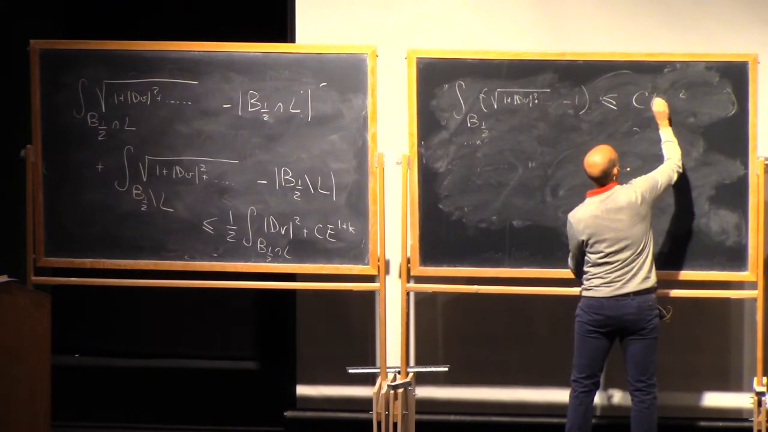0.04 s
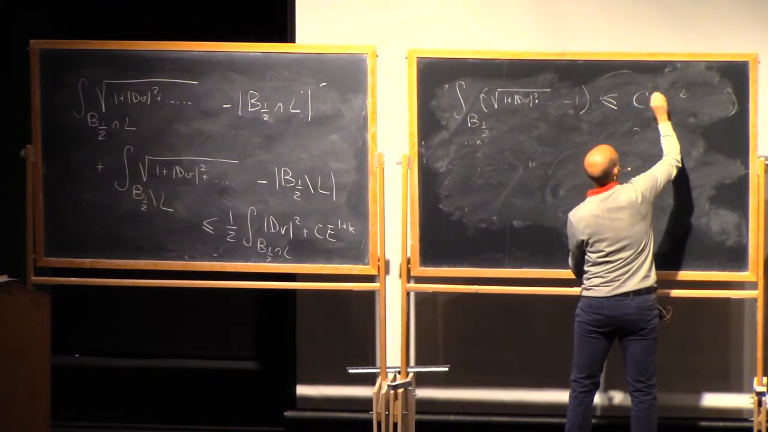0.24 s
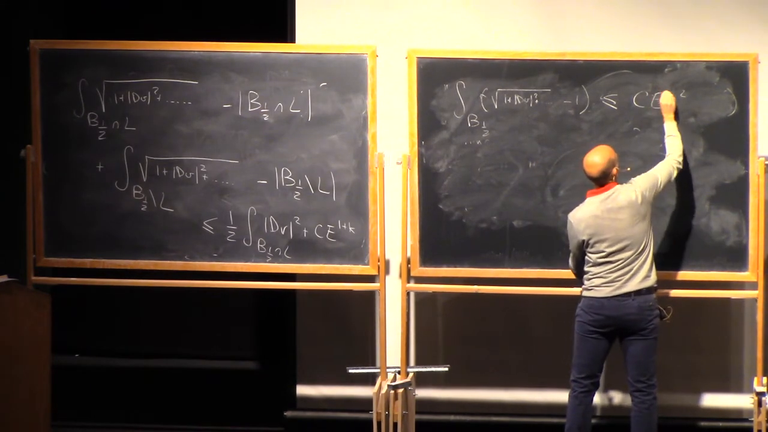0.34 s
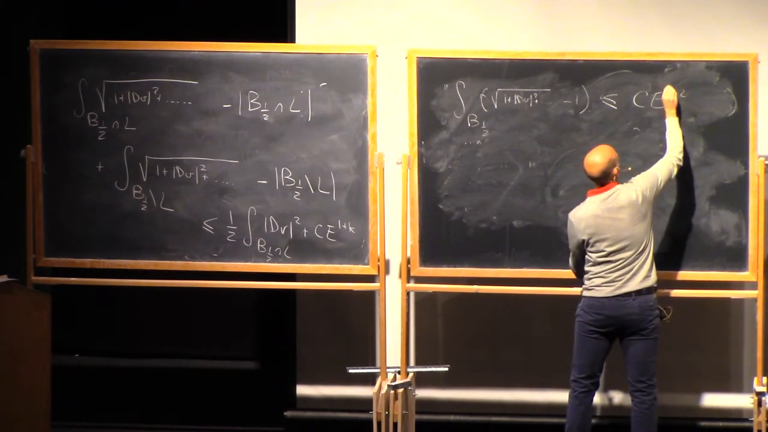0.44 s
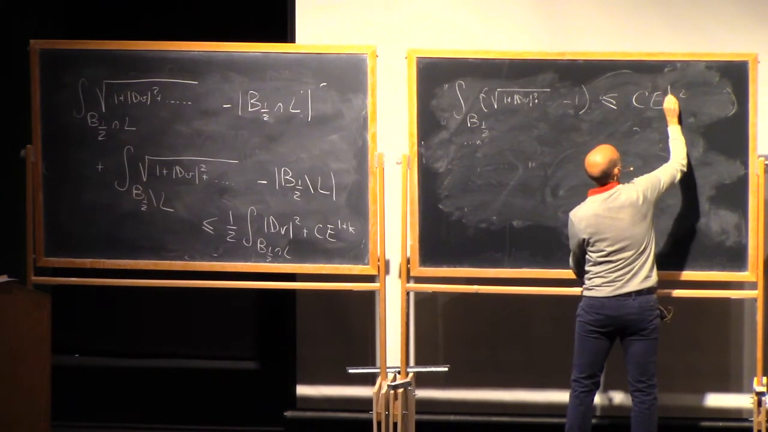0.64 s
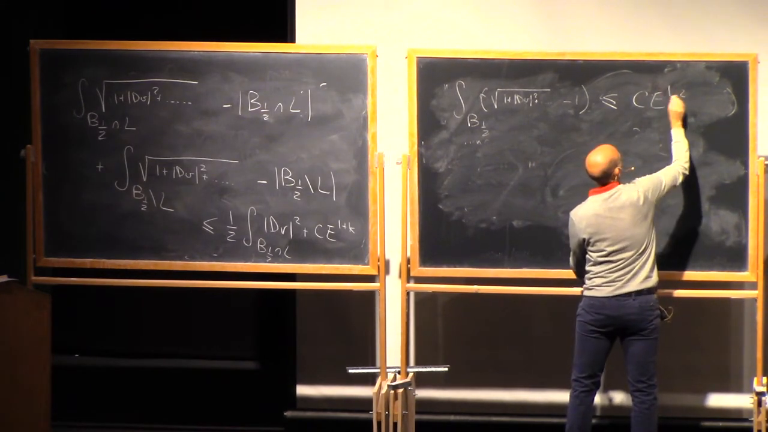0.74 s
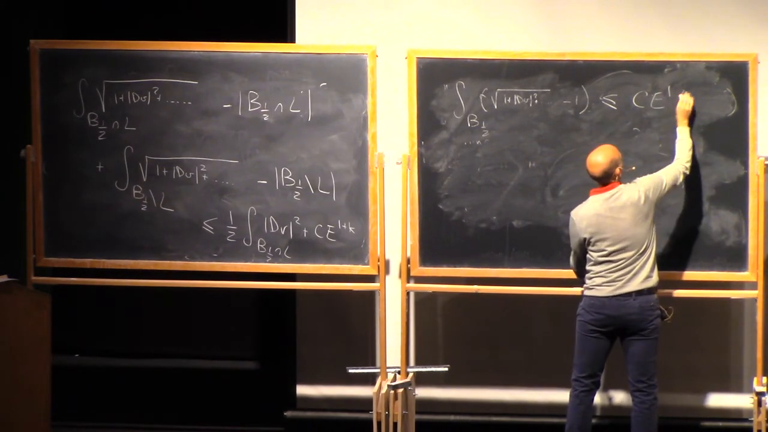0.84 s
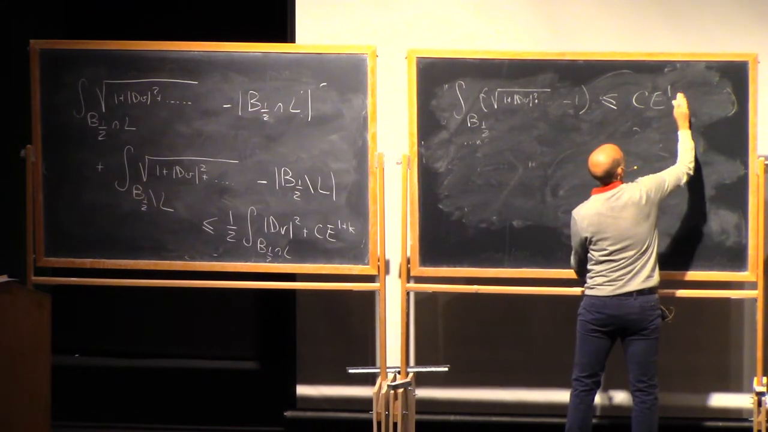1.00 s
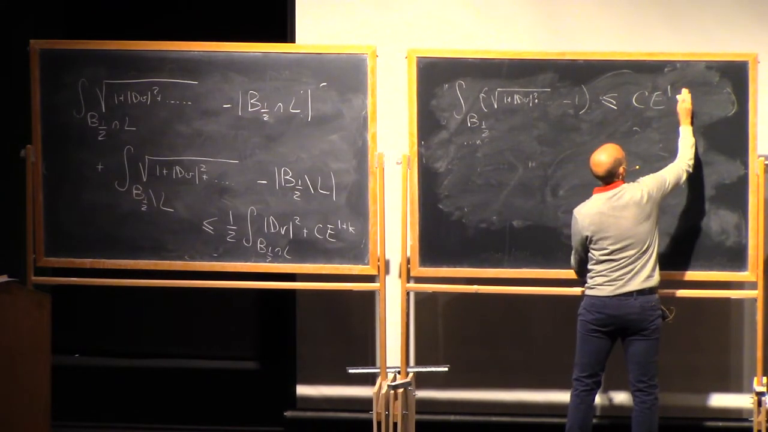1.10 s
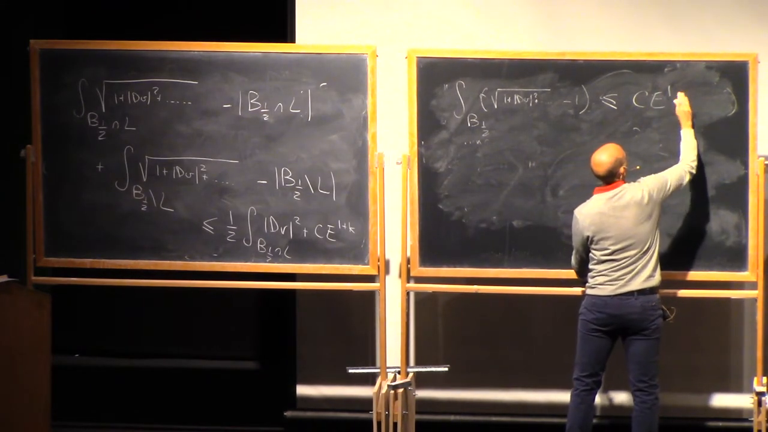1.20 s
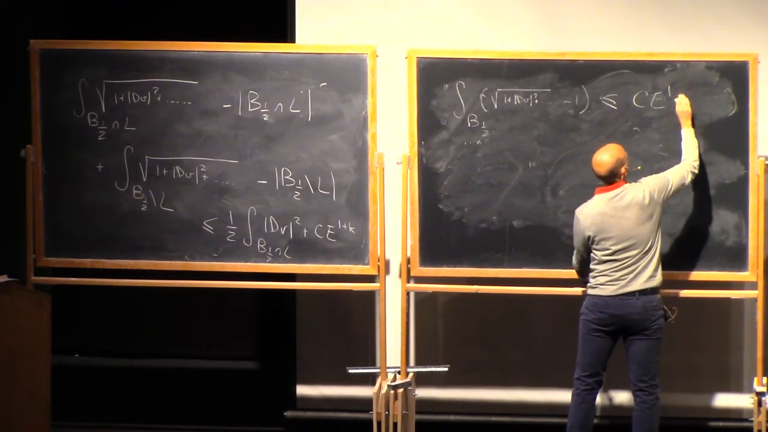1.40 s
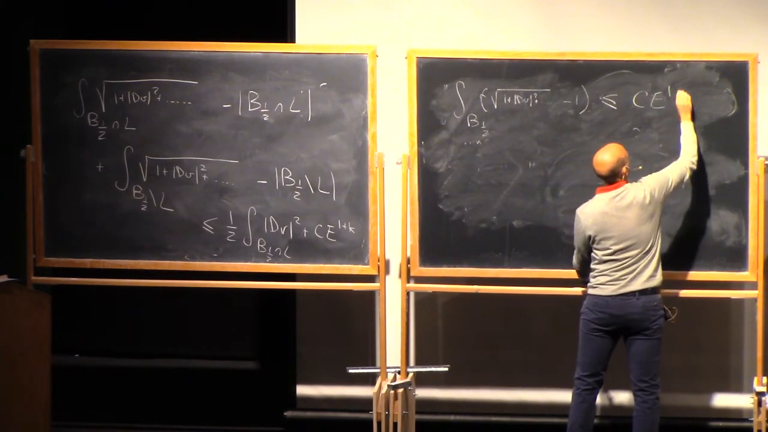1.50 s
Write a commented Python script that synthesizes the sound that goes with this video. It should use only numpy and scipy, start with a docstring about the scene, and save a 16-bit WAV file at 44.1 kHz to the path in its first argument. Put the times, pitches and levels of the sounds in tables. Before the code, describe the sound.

Chalk taps and scrapes on a blackboard in a quiet room.

```python
"""Chalk on a blackboard

Chalk writes on a big framed blackboard over the low rumble of a quiet lecture room.
The stick lands twice with a sharp tap and knocks lightly between strokes; the panel thumps and
rings and the room answers. The first strokes scrape faintly as the chalk crumbles in tiny slips;
the later, lighter ones only hiss."""
import sys
import numpy as np
from scipy import signal
from scipy.fft import rfft, irfft
from scipy.io import wavfile

SR = 44100
rng = np.random.default_rng(int(sys.argv[2]) if len(sys.argv) > 2 else 0)


def persist_wave(psi):
    """Save psi, clipped to +-1, as 16-bit WAV."""
    counts = np.round(np.clip(psi, -1, 1) * 32767).astype(np.int16)
    wavfile.write(sys.argv[1], SR, np.atleast_2d(counts).T)


N = 68355
TIME = np.arange(N) / SR


def from_db(db):
    return 10 ** (np.asarray(db) / 20)


def rms_one(x):
    return x / np.sqrt(np.mean(x ** 2) + 1e-20)


def ring(drive, hz, t60):
    """A unit click sets a sine of height 1 ringing."""
    r, w = from_db(-60 / (t60 * SR)), 2 * np.pi * hz / SR
    return signal.lfilter([0, np.sin(w)], [1, -2 * r * np.cos(w), r * r], drive + 1e-18)


def resonance(drive, hz, width):
    """Band-pass with gain 1 at its centre."""
    r, w = np.exp(-np.pi * width / SR), 2 * np.pi * hz / SR
    gain = (1 - r * r) / 2
    return signal.lfilter([gain, 0, -gain], [1, -2 * r * np.cos(w), r * r], drive + 1e-18)


def noise(spectrum):
    """Steady noise of the given colour, rms 1."""
    hz, db = np.transpose(spectrum)
    bins = np.maximum(np.fft.rfftfreq(N, 1 / SR), 1)
    colour = from_db(np.interp(np.log(bins), np.log(hz), db))
    return rms_one(irfft(rfft(rng.standard_normal(N)) * colour, N))


def diffuse(x, spectrum, rise_s, t60):
    """Dense echoes that build up and die away; gain 1 around 1 kHz."""
    echoes = noise(spectrum) * (1 - np.exp(-TIME / rise_s)) * from_db(-60 * TIME / t60)
    mids = abs(rfft(echoes))[300 * N // SR:2000 * N // SR]
    return signal.fftconvolve(x, echoes / np.sqrt(np.mean(mids ** 2)))[:N]


def strokes(rows, roundness=0.27):
    """Each stroke swells and fades as the hand speeds up and stops."""
    power = np.zeros(N)
    for start, length, db in rows:
        arch = abs(np.sin(np.pi * np.clip((TIME - start) / length, 0, 1)))
        power += (from_db(db) * arch ** roundness) ** 2
    return np.sqrt(power)


def room_rumble():
    """A low, steady bed of room tone."""
    # room tone colour: f/Hz, level/dB
    colour = [(25, -21), (45, -3), (65, -2.5), (90, 4.5), (115, 3), (160, 2), (250, -6), (340, -10),
              (500, -9), (900, -16.5), (1400, -23.5), (2500, -30.5), (5000, -32), (16000, -34)]
    return from_db(-52) * noise(colour)


def scrape(slips_per_s=5000, scatter_db=2.5):
    """Chalk crumbles in dense tiny slips that excite a few resonances."""
    # scraping strokes: t/s, length/s, level/dB
    gestures = [(-.05, 0.11, -61.5), (.08, 0.15, -63.5), (.34, 0.2, -59.5), (.52, 0.12, -68.5),
                (.66, 0.11, -63.5), (.76, 0.16, -63)]
    # scrape resonances: f/Hz, width/Hz, level/dB
    peaks = [(1661, 168, 6), (2320, 370, -6.5), (2893, 300, -3.5), (4830, 250, -13)]
    slips = (rng.random(N) < slips_per_s / SR) * rng.standard_normal(N)
    slips *= from_db(scatter_db * rng.standard_normal(N))
    rasp = sum((-1) ** k * from_db(db) * resonance(slips, hz, width)
               for k, (hz, width, db) in enumerate(peaks))
    return rms_one(rasp) * strokes(gestures)


def drag():
    """A firmly dragged stick sets the panel rumbling."""
    # firm strokes: t/s, length/s, level/dB
    gestures = [(-.03, .1, -56.5), (.16, 0.067, -54.5), (.4, 0.078, -59), (.665, .23, -56)]
    # panel rumble colour: f/Hz, level/dB
    colour = [(100, -16), (220, 1.5), (400, 1), (600, -2), (900, -6), (1300, -17), (3000, -36.5)]
    return noise(colour) * strokes(gestures)


def glide():
    """With little pressure a stroke gives only a fine, high hiss."""
    # envelopes of two single light strokes: t/s, level/dB
    singles = [
        [(0.0, -72), (0.078, -69.5), (0.09, -99), (0.13, -82)],
        [(0.51, -73), (0.542, -69.5), (0.622, -73), (0.65, -82)],
    ]
    # envelope of a run of five: t/s, level/dB
    run = [(0.85, -85), (0.886, -72), (0.954, -60.5), (0.992, -64), (1.008, -79), (1.042, -59),
           (1.106, -64), (1.118, -60), (1.248, -62.5), (1.264, -66), (1.324, -62.5), (1.396, -74),
           (1.404, -81), (1.43, -72)]
    # hiss colour: f/Hz, level/dB
    colour = [(2500, -19.5), (4500, -8.5), (7000, -4.5), (8500, -3.5), (9800, 1.5), (11000, -1),
              (12200, 2.5), (13500, -8), (15000, -4), (16000, -4)]
    curves = map(np.transpose, (*singles, run))
    envelope = sum(np.interp(TIME, t, from_db(db), left=0, right=0) for t, db in curves)
    return noise(colour) * from_db(2.5) * envelope


def knock(force, snap):
    """The attack of a contact: the push knocks on the panel and the stick rings briefly."""
    # chalk stick modes: f/Hz, level/dB, t60/s
    modes = [(3450, -27.5, 0.0091), (5000, -24.5, 0.0036), (6100, -47, 0.0076), (7400, -25.5, 0.0037),
             (9400, -35, 0.0054), (10700, -38, .004)]
    panel_low_hz, tip_hz, knock_hz, knock_t60_s = 177, 5100, 1730, 0.0018
    push = signal.sosfilt(signal.butter(1, panel_low_hz, "high", fs=SR, output="sos"), force + 1e-18)
    push = signal.sosfilt(signal.butter(2, tip_hz, fs=SR, output="sos"), push)  # soft tip rounds it off
    clack = from_db(1) * resonance(push, knock_hz, width=np.log(1000) / np.pi / knock_t60_s)
    return push + clack + sum(from_db(db) * ring(snap, hz, t60) for hz, db, t60 in modes)


def panel(force, thump, scatter_db=2):
    """The board thumps and rings; each spot on it stirs the ringing modes differently."""
    # thump modes: f/Hz, level/dB, t60/s
    low_modes = [(132, -24, 0.017), (93, -14, 0.042), (114.8, -28.5, 1)]
    # ringing modes: f/Hz, level/dB, t60/s
    modes = [(182.1, -57.5, 0.48), (260.1, -63.5, 0.64), (332.3, -59, 0.17), (515, -57.5, 0.41),
             (601, -56, 0.2), (652.4, -61, 0.16), (692, -55.5, 0.1), (862, -54.5, 0.3), (1120, -56, 0.26),
             (1380, -70, 0.09), (1895, -51, 0.22)]
    body = -sum(from_db(db) * ring(thump, hz, t60) for hz, db, t60 in low_modes)
    spot = rng.choice([-1, 1], len(modes)) * from_db(scatter_db * rng.standard_normal(len(modes)))
    return body + sum(share * from_db(db) * ring(force, hz, t60)
                      for share, (hz, db, t60) in zip(spot, modes))


def bending_waves(attack):
    """The knock spreads through the panel in a short, dense wash."""
    # bending wave colour: f/Hz, level/dB
    colour = [(60, -1), (200, -4), (400, 5), (700, 9.5), (1200, 4), (2000, 5), (3000, 13.5), (6000, -1),
              (14000, -16)]
    return diffuse(attack, colour, rise_s=0.00075, t60=0.071)


def crack(snap):
    """The chalk tip gives a brittle crack that lingers in the room."""
    # crack colour: f/Hz, level/dB
    colour = [(1000, -1.5), (2000, 4), (2700, 9), (3600, -4.5), (4800, 4.5), (5900, 3.5), (7000, -8.5),
              (8000, -8.5), (10000, -15), (15000, -30)]
    close = from_db(-1.5) * diffuse(snap, colour, rise_s=0.00025, t60=0.031)
    return close + from_db(-8.5) * diffuse(snap, colour, rise_s=0.004, t60=0.28)


def room_tail(attack):
    """The room answers a knock with a short reverb."""
    # reverb colour: f/Hz, level/dB
    colour = [(60, 6), (150, 14.5), (500, 13.5), (1000, 4), (2000, -2.5), (4000, 11.5), (14000, 5)]
    return from_db(-11.5) * diffuse(attack, colour, rise_s=0.004, t60=0.49)


def contacts(rows, direct_db, waves_db, rebound=0, rebound_s=0.00059):
    """Each contact is a half-sine push, with clicks that drive the thump and the chalk's snap."""
    force, thump, snap = np.zeros((3, N))
    for t, db, contact_ms, thump_db, crack_db in rows:
        start = int(t * SR)
        for delay, share in ((0, 1), (rebound_s, rebound)):
            elapsed_ms = (TIME - start / SR - delay) * 1000
            force += share * from_db(db) * np.sin(np.pi * np.clip(elapsed_ms / contact_ms, 0, 1))
        thump[start] += from_db(db + thump_db)
        snap[start] += from_db(db + crack_db)
    attack = knock(force, snap)
    board = panel(force, thump) + from_db(waves_db) * bending_waves(attack)
    return from_db(direct_db) * attack + board + crack(snap) + room_tail(attack)


def touches():
    """The stick knocks lightly between strokes."""
    # light contacts: t/s, level/dB, contact/ms, thump/dB, crack/dB
    hits = [(.002, -33.5, 0.71, 5.5, -2), (.166, -29, 1.1, -11, -19), (.2535, -30.5, .4, -15, -0.5),
            (.2855, -32.5, 0.51, -15, -8), (.336, -55, 0.47, 0, -10), (.408, -38.5, 1.03, -10, 3),
            (.5525, -34, 0.57, 6, -1.5), (.669, -29.5, 1.1, -24, -9), (.738, -30, 1.28, -6, -17),
            (.776, -34.5, 1.37, -21, -24), (.808, -35, 0.66, 1, -11), (1.074, -35, 1.3, 2, -19),
            (1.198, -63, 1.8, -11, -8), (1.262, -47, 1.5, 9, -9)]
    return contacts(hits, direct_db=-5, waves_db=-7)


def taps():
    """The stick lands hard twice, each time on a new spot."""
    # hard landings: t/s, level/dB, contact/ms, thump/dB, crack/dB, rebound/dB
    hits = [(0.2173, -13.5, 0.582, -3.5, 1.5, -55), (0.4889, -14, 0.548, -3, -6, -11.5)]
    return sum(contacts([hit], direct_db=0, waves_db=-7.5, rebound=from_db(rebound_db))
               for *hit, rebound_db in hits)


def panel_sway(hz=114.8):
    """The whole panel sways in its frame with a brief low boom."""
    # booms: peak t/s, level/dB, half length/s
    booms = [(0.2251, -30, 0.0047), (.267, -32, .011), (0.498, -39.5, 0.0048), (.555, -42, 0.021),
             (0.644, -43, 0.048), (.875, -46.5, 0.017), (1.105, -43, 0.0078)]
    return -sum(from_db(db) * np.exp(-((TIME - t) / half) ** 2) * np.sin(2 * np.pi * hz * (TIME - t))
                for t, db, half in booms)


def crumbs():
    """Crumbs of chalk snap under the tip, each a tiny pitched tick."""
    # snaps: t/s, f/Hz, level/dB
    ticks = [(0.24, 3050, -45), (0.2531, 4300, -43), (0.2858, 1660, -35.5), (.51, 3000, -39.5),
             (0.5528, 1830, -52), (0.808, 2010, -45)]
    return sum(from_db(db) * ring(signal.unit_impulse(N, int(t * SR)), hz, t60=0.0049)
               for t, hz, db in ticks)


def scene():
    """Taps, touches and strokes over the room's rumble, in mono."""
    writing = taps() + touches() + panel_sway() + crumbs() + scrape() + drag() + glide()
    return (writing + room_rumble())[None]


def record(dry, low_cut_hz=44.4, high_cut_hz=16000):
    """The microphone loses the deepest bass; the top is cut steeply."""
    thin = signal.sosfilt(signal.butter(2, low_cut_hz, "high", fs=SR, output="sos"), dry)
    return signal.sosfilt(signal.ellip(10, .2, 70, high_cut_hz, fs=SR, output="sos"), thin)


dry = scene()
out = record(dry)
persist_wave(out)
```